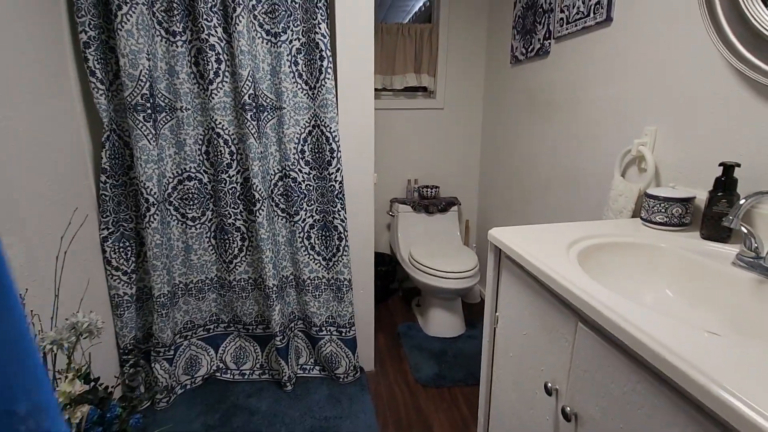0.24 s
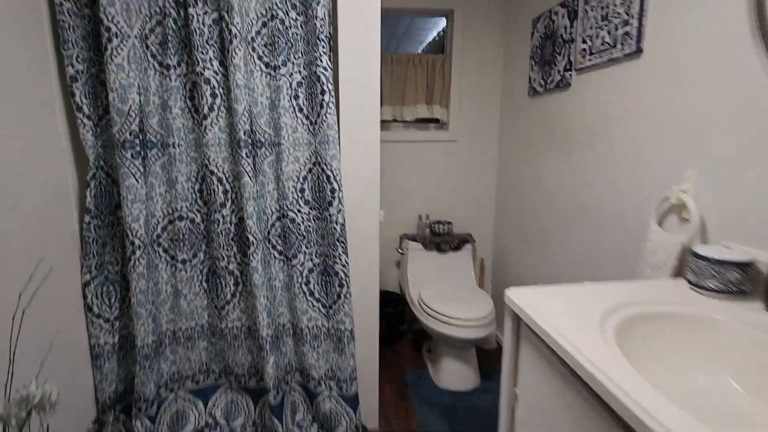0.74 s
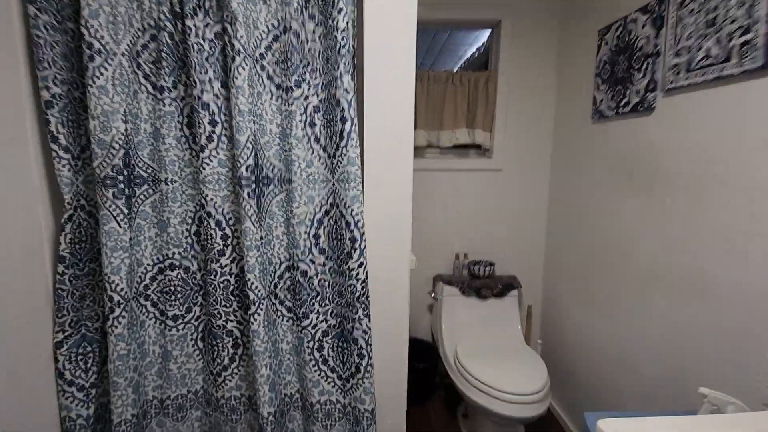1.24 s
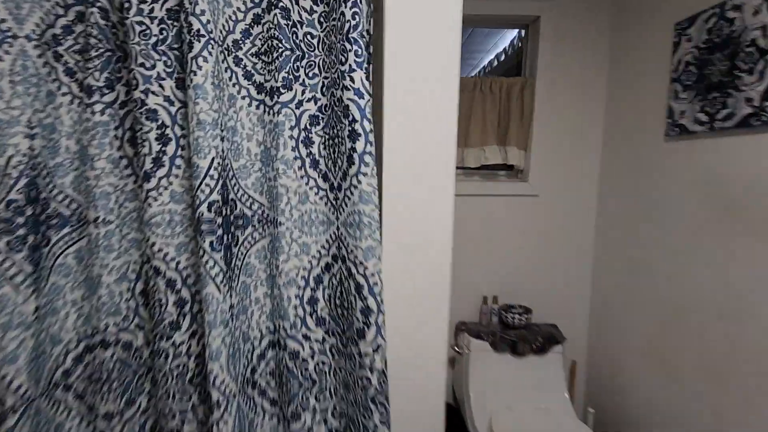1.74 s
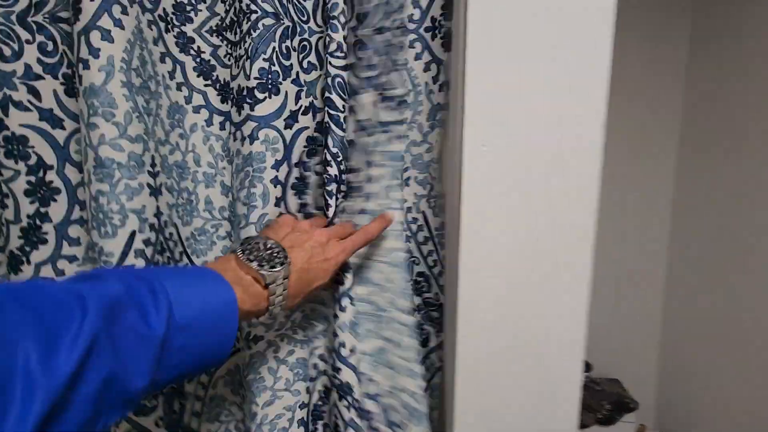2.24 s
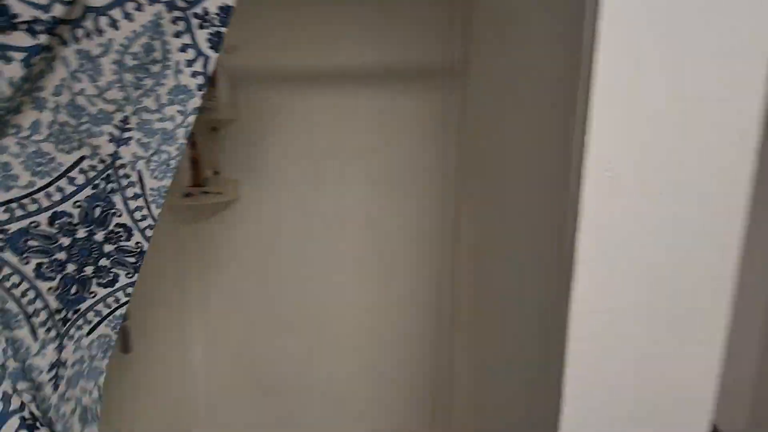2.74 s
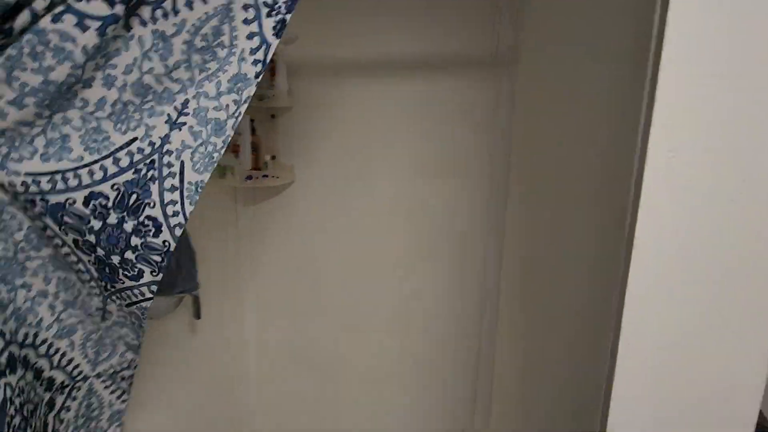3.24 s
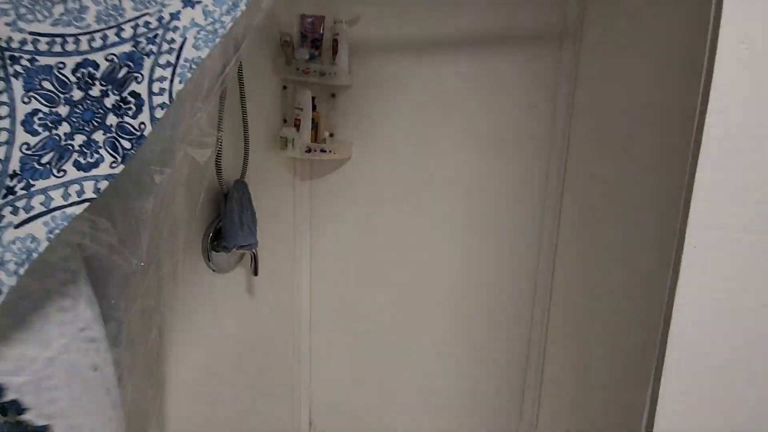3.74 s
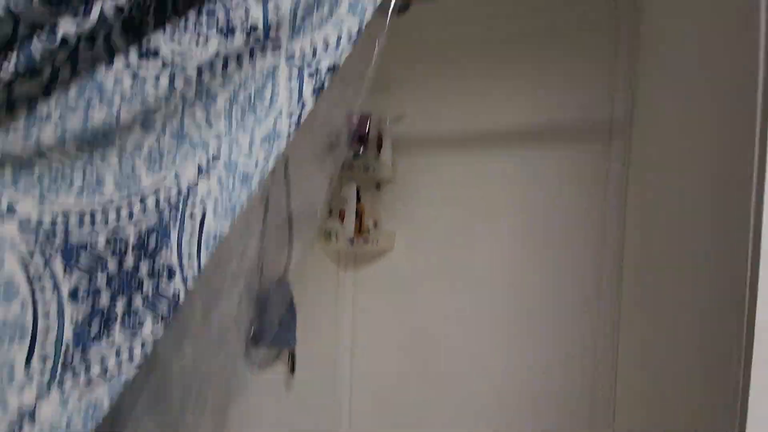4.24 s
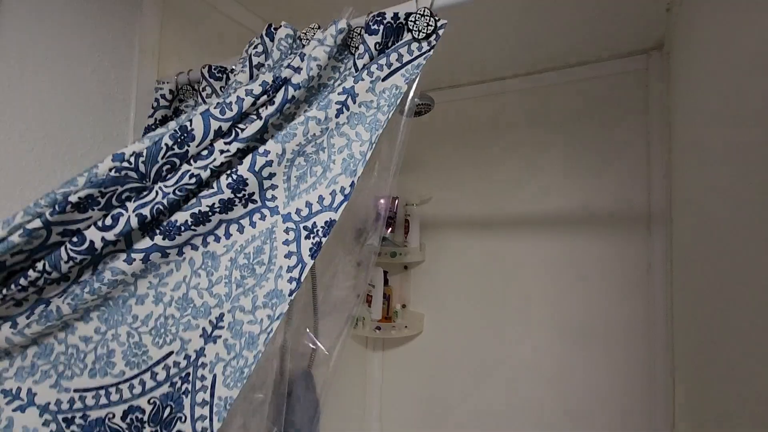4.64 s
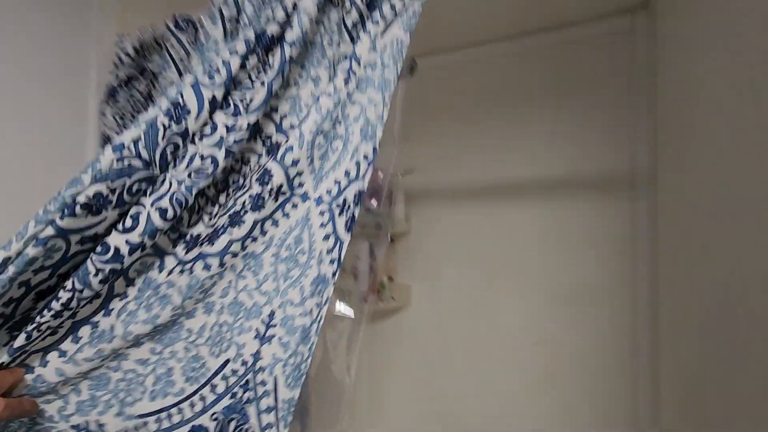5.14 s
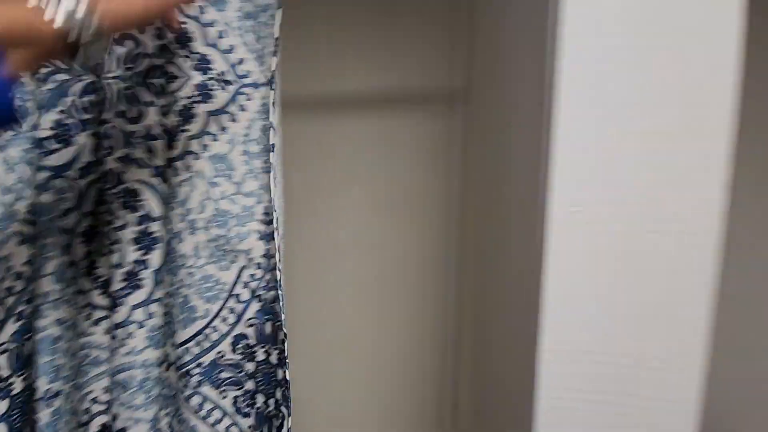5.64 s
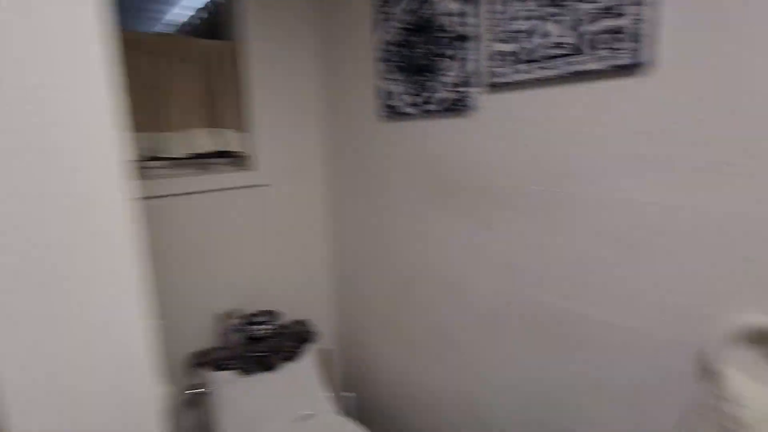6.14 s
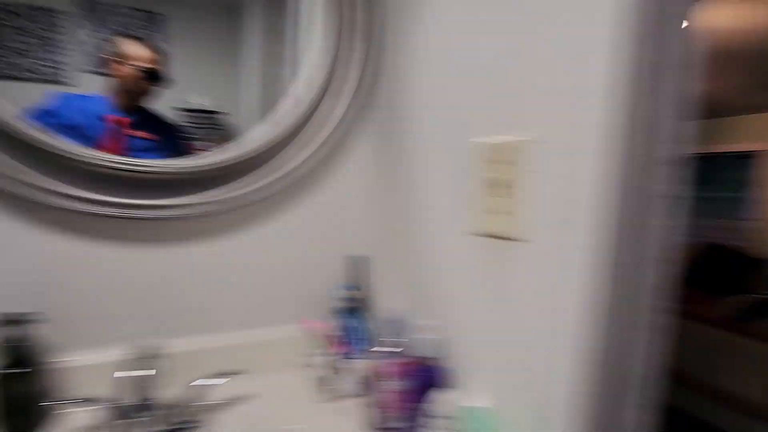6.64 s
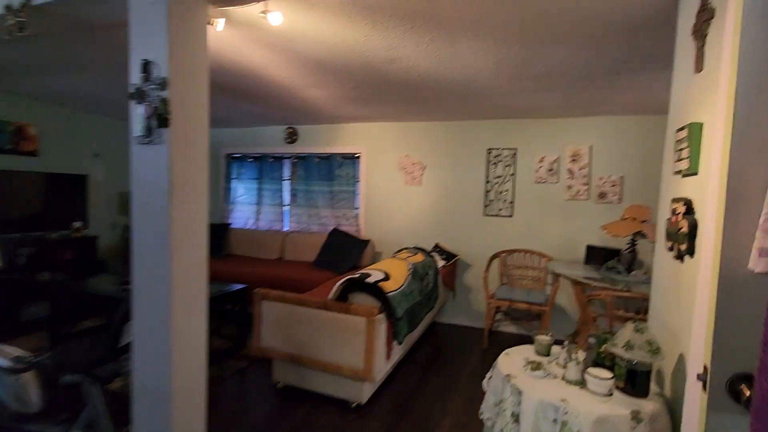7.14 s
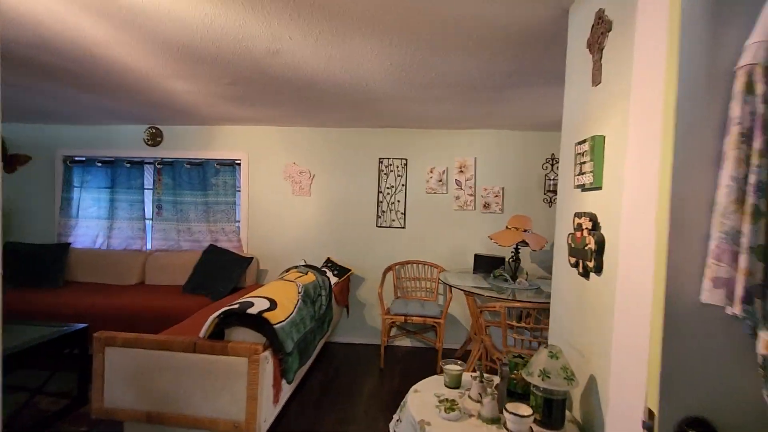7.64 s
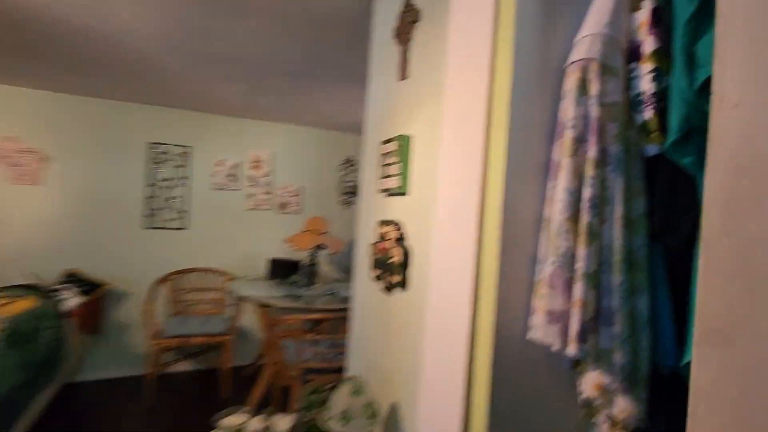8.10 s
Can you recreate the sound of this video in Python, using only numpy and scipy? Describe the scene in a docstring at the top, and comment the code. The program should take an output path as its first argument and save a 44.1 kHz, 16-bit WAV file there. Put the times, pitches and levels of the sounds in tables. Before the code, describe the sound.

Someone walks over a creaky-toned wooden floor, one step heavier than the others, then draws a fabric shower curtain: rings skid, briefly sing and crack against the rod, while plastic creases tick. A gentler push rustles and fades, and a last pull scrapes the rings back. A hollow knock, light watch jingle and muffled footfalls close it. Near microphone, short room reflections, low floor rumble and quiet air.

```python
"""In a small bathroom reached over a wooden floor, a walker draws a shower curtain aside and pulls it shut.
Curtain rings scrape by stick-slip friction and clack by impact; both excite the rod and shower stall.
Cloth and plastic liner rustle as filtered noise, sparse ticks and snapping creases.
Footsteps sum decaying floor modes with filtered heel impacts; clothes swish as dense noise grains.
A metal watch band jingles, dry knocks ring hollow, joists rumble and quiet air hisses."""
import sys
import numpy as np
from scipy import signal
from scipy.fft import rfft, irfft, next_fast_len
from scipy.io import wavfile
from scipy.ndimage import uniform_filter1d, map_coordinates

SR = 44100
rng = np.random.default_rng(int(sys.argv[2]) if len(sys.argv) > 2 else 0)


def transcribe(u):
    """Save the signal u as a 16-bit wav file named by the first command-line argument.

    u: samples, shape (n,) or (channels, n), limited to [-1, 1]; the rate is SR.
    q: integer samples, one column per channel.
    """
    v = np.clip(np.atleast_2d(u).T, -1, 1)
    q = np.round(v * 32767).astype(np.int16)
    wavfile.write(sys.argv[1], SR, q)


N = 369116

# All levels are relative to the fixed gains of the function that uses them.
# The walker shifts weight and the floor sways: start_s, length_s, rumble_db
WEIGHT_SHIFTS = [(0, 0.44, -42.5), (1.82, 0.13, -45.5), (2.2, 0.37, -47), (3.9, 0.087, -63),
                 (6.0, 0.51, -50.5), (6.45, 0.53, -50.5), (7.42, 0.089, -52.5), (7.88, 0.042, -48),
                 (8.32, 0.054, -39.5)]
SHIFT_ATTACK_S, SHIFT_RELEASE_S, RESTING_SWAY_DB = 0.2, 0.93, -65
# Spectrum of the rumbling joists: frequency_hz, gain_db
RUMBLE_SPECTRUM = [(15, -8), (27, -4.5), (36, -5.5), (44, -1.5), (52, -3.5), (90, -11.5), (130, -24),
                   (250, -37.5), (600, -89)]
# Spectrum of the quiet air: frequency_hz, gain_db
AIR_SPECTRUM = [(60, -4.5), (150, -14), (308, -24), (800, -22.5), (1500, -24), (2200, -22.5), (3000, -29),
                (4200, -30), (5400, -23.5), (7700, -25.5), (10000, -40), (13500, -28), (16000, -36.5)]
# Likeness of a diffuse sound at two microphones: frequency_hz, coherence (-1 to 1)
DIFFUSE_COHERENCE = [(60, 0.97), (150, 0.83), (280, 0.77), (520, 0.71), (1000, -0.05), (2000, 0.083),
                     (5000, -0.042)]

# Footfalls: start_s, thump_db, thump_hz, joist_db (relative to the thump), heel_db, hardness_hz
FOOTFALLS = [(0.008, -47, 187, -1, -35, 690), (0.783, -38, 151, -43, -28.5, 760),
             (1.071, -60, 164, -12, -43, 1280), (1.148, -57, 134, -3, -44.5, 450),
             (1.701, -24, 102, -0.5, -19.5, 764), (1.822, -51, 104, -3, -27.5, 1200),
             (2.142, -55.5, 189, -14, -40, 806), (6.502, -51, 259, -5, -34.5, 535),
             (7.32, -52, 163, 0, -42, 500), (7.490, -56.5, 182, -13, -39.5, 700),
             (7.794, -32.5, 160, -36, -25.5, 775), (8.202, -31.5, 125.2, -23, -29, 230),
             (8.214, -26, 82.5, -8, -27.5, 197)]
# Resonances of the floorboards: frequency_hz, width_hz, gain_db
BOARD_MODES = [(267.7, 6.9, 9.5), (299, 40, 4), (394, 13, 6), (422, 12, 0), (525, 16, 0), (605, 20, 1.5),
               (645, 18, -9), (1055, 12, 2)]

# Dry knocks of small hard things; the last is the heel's crack: start_s, level_db, brightness_db
KNOCK_EVENTS = [(0.278, -48.5, -2), (1.914, -39.5, 1), (6.7125, -32, 0.5), (7.265, -41.5, 9.5),
                (7.795, -42, 6)]
# Hollow ring of the knocks: frequency_hz, width_hz, gain_db
HOLLOW_MODES = [(1474, 56, 6.5), (1700, 260, 7), (2080, 250, 13.5), (5260, 320, -1.5), (7500, 380, 3)]
# Spectrum of the knocks: frequency_hz, gain_db
KNOCK_SPECTRUM = [(100, 8), (350, 10.5), (900, 2), (1400, 3), (2100, -6.5), (2800, -2.5), (4500, 2.5),
                  (7800, -4.5), (10000, -7), (13000, 0.5), (16000, -1.5)]

# Strides and reaches that rub the clothes: start_s, length_s, swish_db
SWISH_EVENTS = [(.88, 0.082, -64), (1.42, 0.059, -58), (1.80, 0.32, -56), (6.58, 0.16, -57),
                (6.8, 0.36, -64), (7.38, 0.16, -60.5), (7.78, 0.28, -54.5), (8.22, 0.077, -60.5)]
SWISH_ATTACK_S, SWISH_RELEASE_S = 0.22, 0.44
CLOTHES_SIDE_DB = -4.5  # left minus right

# Shakes of the watch band: start_s, level_db
JINGLE_EVENTS = [(1.798, -41.5), (1.868, -52), (6.825, -57), (7.420, -59), (7.468, -46), (7.488, -56)]
# Clustered resonances of the watch links: frequency_hz, width_hz, gain_db
LINK_MODES = [(6000, 56, -3), (7800, 50, -12), (10440, 63, -0.5), (11740, 100, -2), (12400, 200, -10),
              (13800, 170, 5), (14600, 200, -7), (15550, 200, -8)]

# Curtain motion as it is drawn aside, pushed further, and pulled shut: time_s, motion_db
DRAW, PUSH, SHUT = [
    [(2.22, -46), (2.266, -41.5), (2.424, -40), (2.536, -38), (2.68, -41), (2.928, -48.5), (3.206, -45.5),
     (3.558, -52.5), (3.78, -52)],
    [(3.82, -49.5), (4.032, -45.5), (4.188, -50), (4.414, -53.5), (4.602, -54), (4.752, -68), (4.94, -67.5)],
    [(4.98, -58.5), (5.232, -53.5), (5.376, -53), (5.804, -55.5), (6.004, -40), (6.148, -42.5),
     (6.266, -42.5), (6.436, -52.5), (6.6, -61.5)],
]
# Spectrum of rubbing fabric: frequency_hz, gain_db
RUSTLE_SPECTRUM = [(100, -16.5), (300, -3.5), (700, -4.5), (1500, -5), (3000, -3), (5500, -0.5), (6700, -4),
                   (7900, -0.5), (9200, -9.5), (10800, -8.5), (12200, -4.5), (14500, -3.5), (16000, -6.5)]
# Balance of the curtain: frequency_hz, left_minus_right_db
CURTAIN_SIDE = [(60, 0.5), (180, 1), (550, 2), (1650, -0.5), (4970, -0.5), (15000, -2.0)]

# Rings break loose and skid along the rod: start_s, length_s, scrape_db
RING_SKIDS = [(2.50, 0.094, -38), (2.585, 0.025, -28), (2.85, 0.013, -44.5), (3.86, 0.092, -37.5),
              (4.02, 0.013, -37.5), (4.285, 0.031, -40.5), (4.412, 0.0088, -44), (4.61, 0.16, -49.5),
              (5.215, 0.0074, -49), (5.34, .08, -48.5), (5.98, 0.068, -38.5), (6.042, 0.012, -30),
              (6.175, .02, -35.5), (6.24, 0.039, -39)]
SKID_ATTACK_S, SKID_RELEASE_S = 0.053, 0.2
# The fastest runs sing on the rod: start_s, length_s, level_db, pitch_hz
RING_RUNS = [(2.518, 0.044, -38.5, 2264), (4.29, .03, -49, 2210), (6.175, 0.064, -39.5, 2060)]
RUN_ATTACK_S, RUN_RELEASE_S = 0.062, 0.2
# Resonances of the rod, and at 280 Hz of the shower stall: frequency_hz, width_hz, gain_db
ROD_AND_STALL_MODES = [(280, 11, 5.5), (402, 17, 11), (1083, 9.2, 6), (1280, 15, 8), (1460, 12, 10.5),
                       (1730, 10, 12), (1964, 54, 7.5), (2290, 120, 4), (3960, 36, 10.5), (4470, 11, 0),
                       (7460, 120, 9.5)]
# Spectrum of the scraping rings: frequency_hz, gain_db
SCRAPE_SPECTRUM = [(60, -33), (150, -10), (260, 0.5), (400, -6), (650, -3.5), (1000, -3.5), (2100, 0),
                   (2800, 0.5), (4200, -3.5), (7000, -6), (10000, -14.5), (16000, -37)]
RING_DRAG_DB, RING_SONG_DB = -5, -9.5  # scrape and song of dragged rings, relative to the motion
SONG_HZ = 2195
RUN_WIDTH_HZ, SONG_WIDTH_HZ = 210, 300  # a fast run sings more purely than a drag
SLIP_UNEVEN_DB = 2.5

# Creases snapping in the liner at set times: start_s, peak_db, body_db
CREASE_SNAPS = [(2.187, -33.5, 3), (2.2485, -25, -10), (2.2574, -23, 4.5), (2.9338, -26.5, -13),
                (2.9854, -22, -23), (3.5032, -25.5, -11), (3.816, -24.5, -12), (4.1784, -26, 0.5),
                (4.238, -23, -15), (4.542, -29, -2.5), (4.999, -36, -5), (5.013, -30.5, -7),
                (5.3988, -33, -16), (5.4488, -29.5, -2), (5.7376, -29.5, -5), (6.6414, -36, 7),
                (6.6613, -34, -22)]
# Further creases snap at random, louder when the curtain moves harder
CREASES_PER_S, CREASE_DB, CREASE_SCATTER_DB, CREASE_BODY_DB = 16, -34, 4, -6
CREASE_GROWS = 0.77  # dB of snap per dB of motion

# Rings striking the rod and each other: start_s, peak_db, body_db
RING_CLACKS = [(2.578, -16, -1.5), (2.599, -12.5, -17), (2.6124, -15.5, -7), (2.6584, -19.5, -22),
               (2.6984, -24.5, -8.5), (2.8521, -28.5, 1), (3.8449, -19, -14.5), (4.0073, -22, -10.5),
               (6.0399, -10.5, -27), (6.0468, -15.5, -13), (6.323, -22, -35), (6.4254, -20, -22)]
# Spectrum of clacks and snaps: frequency_hz, gain_db
CLICK_SPECTRUM = [(150, 1), (400, -12), (1000, 1.5), (2200, -6), (2900, -0.5), (4000, 0.5), (7900, -3),
                  (9300, -8), (10800, -10), (12300, -0.5), (16000, -1.5)]

TOP_HZ = 15850  # upper limit of the band


def amp(db):
    """Decibel law: amplitude gain is ten to the power of dB / 20."""
    return 10 ** (np.asarray(db) / 20)


def unit(x):
    """Root-mean-square normalisation to 1."""
    return x / np.sqrt(np.mean(x ** 2) + 1e-20)


def balance(left_minus_right_db):
    """Level panning: half the difference raises the left, half lowers the right."""
    return amp(left_minus_right_db * np.array([[.5], [-.5]]))


def along(points, hz):
    """Interpolation of (Hz, value) points over logarithmic frequency."""
    f, v = np.transpose(points)
    return np.interp(np.log(hz + 1), np.log(f), v)


def level(rows):
    """Envelope interpolated in decibels from (s, dB) rows, fading out beyond both ends."""
    s, db = np.transpose(rows)
    times = np.r_[s[0] - .1, s, s[-1] + .1]
    return amp(np.interp(np.arange(N) / SR, times, np.r_[-100, db, -100]))


def swells(rows, attack_s, release_s):
    """Energy sum of (s, length, dB) events: linear rise up to s, hold, then a 60 dB fall in release_s."""
    t = np.arange(N) / SR
    each = []
    for s, length, db in rows:
        rise = np.clip(1 + (t - s) / attack_s, 0, 1)
        fall_db = 60 * np.maximum(t - s - length, 0) / release_s
        each.append(amp(db - fall_db) * rise)
    return np.linalg.norm(each, axis=0)


def wobble(rate):
    """Band-limited randomness: a smooth curve through rate random knots a second."""
    knots = rng.standard_normal(int(N * rate / SR) + 4)
    return map_coordinates(knots, [np.arange(N) * rate / SR])


def grains(rate, spread_db):
    """Shot noise: about rate random impulses a second, of uneven size, with rms 1."""
    struck = rng.random(N) < rate / SR
    size = rng.standard_normal(N)
    unevenness = amp(spread_db * np.clip(rng.standard_normal(N), -2, 2))
    return unit(struck * size * unevenness)


def filtered(x, response):
    """Linear filtering: the spectrum of x times a function of frequency."""
    n = x.shape[-1]
    m = next_fast_len(n + 8192)
    return irfft(rfft(x, m) * response(np.fft.rfftfreq(m, 1 / SR)), m)[..., :n]


def coloured(x, gain_db, size=2048):
    """Minimum-phase filtering to a dB response: causality keeps attacks sharp."""
    cepstrum = irfft(np.log(amp(gain_db(np.fft.rfftfreq(size, 1 / SR))) + 1e-6))
    # Folding the cepstrum onto positive time makes the filter causal
    cepstrum[1:size // 2] *= 2
    cepstrum[size // 2 + 1:] = 0
    impulse = irfft(np.exp(rfft(cepstrum)))
    return signal.fftconvolve(x, impulse[None], axes=1)[:, :x.shape[1]]


def resonant(x, modes):
    """Modal resonance: a body answers as a sum of (Hz, width, dB) band-pass modes."""
    def response(f):
        return sum(amp(db) * 1j * f * w / (c * c - f * f + 1j * f * w) for c, w, db in modes)
    return filtered(x, response)


def add(track, s, x):
    """Superposition: mix x into the track at time s."""
    start = max(0, round(s * SR))
    part = track[..., start:start + x.shape[-1]]
    part += x[..., :part.shape[-1]]


def diffuse(n):
    """Diffuse-field coherence: the mid-to-side ratio sets the likeness of two noise channels."""
    def turn(hz):
        return np.arccos(np.clip(along(DIFFUSE_COHERENCE, hz), -1, 1)) / 2
    noise = rng.standard_normal((2, n))
    mid, side = filtered(noise, lambda hz: np.array([np.cos(turn(hz)), np.sin(turn(hz))]))
    return np.array([mid + side, mid - side])


def in_room(x, wet_db, lead_ms, low_t60=0.23, high_t60=0.11, split_hz=6000):
    """Reverberation: direct sound leads by lead_ms at left; a diffuse tail dies faster in the treble."""
    t = np.arange(SR // 3) / SR

    def tail(t60):
        # Energy builds over the first 1.3 ms: the first walls are a little way off
        fade = amp(-60 * t / t60) ** 2 * np.clip(t / 0.0013, 0, 1) ** 2
        energy = signal.fftconvolve(x ** 2, fade / fade.sum())[:len(x)]
        return np.sqrt(np.abs(energy)) * diffuse(len(x))

    def low(hz):
        return 1 / (1 + (hz / split_hz) ** 2)

    wet = filtered(tail(low_t60), lambda hz: np.sqrt(low(hz)))
    wet = wet + filtered(tail(high_t60), lambda hz: np.sqrt(1 - low(hz)))
    ears = np.array([[1], [-1]])
    direct = filtered(x, lambda f: np.exp(1j * np.pi * f * lead_ms / 1000 * ears))
    return (direct + amp(wet_db) * wet) / np.hypot(1, amp(wet_db))


def contact(t60, wet_db, lead_ms):
    """Impact excitation: a unit-energy, decaying noise burst placed in the room."""
    t = np.arange(SR // 4) / SR
    burst = rng.choice([-1, 1], len(t)) * amp(-60 * t / t60)
    return in_room(burst / np.linalg.norm(burst), wet_db, lead_ms)


def background():
    """Broadband noise shaping: joists rumble under the walker, over the quiet air of the house."""
    rumble = unit(filtered(diffuse(N), lambda hz: amp(along(RUMBLE_SPECTRUM, hz))))
    air = unit(filtered(diffuse(N), lambda hz: amp(along(AIR_SPECTRUM, hz))))
    sway = np.hypot(amp(RESTING_SWAY_DB), swells(WEIGHT_SHIFTS, SHIFT_ATTACK_S, SHIFT_RELEASE_S))
    return sway * rumble + amp(-61.0) * air


def footsteps():
    """Modal decay: each floor spot thumps at its own pitch, weight rocks joists, soft heels dull boards."""
    out, t = np.zeros((2, N)), np.arange(SR) / SR

    def mode(hz, db, t60):
        return amp(db - 60 * t / t60) * np.sin(2 * np.pi * hz * t)

    for s, db, thump_hz, weight_db, heel_db, hard_hz in FOOTFALLS:
        thump = mode(thump_hz, db=6.0, t60=0.17) + mode(thump_hz / 2, db=-9.5, t60=0.56)
        joists = mode(hz=28.2, db=weight_db, t60=0.8) + mode(hz=38.5, db=weight_db - 21, t60=0.68)
        add(out, s, -amp(db) * (thump + joists))

        def soften(hz):
            return -10 * np.log10(1 + (hz / hard_hz) ** 5) + along([(60, -3.5), (300, -3.5)], hz)

        heel = contact(t60=0.0091, wet_db=2, lead_ms=0)
        boards = coloured(heel + amp(1) * resonant(heel, BOARD_MODES), soften)
        add(out, s, amp(heel_db + 21.0) * boards / np.linalg.norm(boards))
    return out * balance(0.8)


def knocks():
    """Impact and resonance: dry blows excite a hollow middle register."""
    out = np.zeros((2, N))
    for s, db, bright_db in KNOCK_EVENTS:
        def colour(hz):
            return along(KNOCK_SPECTRUM, hz) + along([(3000, 0), (8000, bright_db)], hz)
        blow = contact(t60=0.04, wet_db=1.5, lead_ms=-0.057)
        knock = coloured(blow + amp(4) * resonant(blow, HOLLOW_MODES), colour)
        add(out, s, amp(db + 31.0) * knock / np.linalg.norm(knock))
    return out


def clothes():
    """Friction noise: sleeves and trouser legs swish as dense grains with the rustle's spectrum reshaped."""
    def colour(hz):
        tilt = [(900, 5.5), (1800, 7.5), (3500, -2.0), (8000, 1.5), (14000, 2.0)]
        return along(RUSTLE_SPECTRUM, hz) + along(tilt, hz)
    strength = amp(6.0) * swells(SWISH_EVENTS, SWISH_ATTACK_S, SWISH_RELEASE_S)
    swish = in_room(strength * grains(rate=6100, spread_db=4.5), wet_db=12.5, lead_ms=0)
    return coloured(swish, colour)


def watch():
    """High-frequency modal ringing: steel links shiver against each other and ring briefly."""
    out = np.zeros((2, N))
    for s, db in JINGLE_EVENTS:
        chatter = contact(t60=0.16, wet_db=-1, lead_ms=0)
        hiss = coloured(chatter, lambda hz: along([(6000, -36), (13000, -3)], hz))
        ring = resonant(chatter, LINK_MODES) + amp(-29) * hiss
        add(out, s, amp(db + 32.0) * ring / np.linalg.norm(ring))
    return out


def curtain_path():
    """Kinematics: the (s, dB) rows of all three pulls in sequence."""
    return np.vstack([DRAW, PUSH, SHUT])


def motion():
    """Common driving force: strength of the curtain's movement through all three pulls."""
    return level(curtain_path())


def cloth():
    """Friction and buckling: folds rub with a smooth hiss while the liner crinkles in sparse ticks."""
    rub = rng.standard_normal(N) * amp(2.4 * wobble(24))
    crinkle = amp(-1.0) * grains(rate=240, spread_db=8.0)
    moved = amp(7.5) * motion() * (rub + crinkle)
    return coloured(in_room(moved, wet_db=10.0, lead_ms=0.15), lambda hz: along(RUSTLE_SPECTRUM, hz))


def song(hz, width_hz):
    """Amplitude modulation: random quadrature envelopes make a narrow, fuzzy band around one pitch."""
    phase = 2 * np.pi * hz * np.arange(N) / SR
    sides = [wobble(width_hz) * np.cos(phase) + wobble(width_hz) * np.sin(phase) for side in range(2)]
    return np.array(sides)


def rings():
    """Stick-slip friction: dense tiny slips ring the rod and stall, and fast runs sing in one narrow band."""
    slide = np.hypot(amp(RING_DRAG_DB) * motion(), swells(RING_SKIDS, SKID_ATTACK_S, SKID_RELEASE_S))
    slips = slide * grains(rate=4000, spread_db=1.5) * amp(SLIP_UNEVEN_DB * wobble(35))
    slips = in_room(slips, wet_db=4.5, lead_ms=0.17)
    scrape = slips + amp(-8.5) * resonant(slips, ROD_AND_STALL_MODES)
    scrape = coloured(scrape, lambda hz: along(SCRAPE_SPECTRUM, hz))
    drag_song = amp(RING_SONG_DB) * motion() * song(SONG_HZ, SONG_WIDTH_HZ)
    runs = np.zeros((2, N))
    for s, length, db, hz in RING_RUNS:
        runs += swells([(s, length, db)], RUN_ATTACK_S, RUN_RELEASE_S) * song(hz, RUN_WIDTH_HZ)
    return amp(6.5) * scrape + drag_song + runs


def patchy(x, depth_db, size=512):
    """Random time-frequency gain: the rustle and scrape are uneven, patchy in grain."""
    z = signal.stft(x, nperseg=size)[2]
    field = uniform_filter1d(rng.standard_normal(z.shape[1:]), size=3, axis=0)
    field = uniform_filter1d(field, size=8, axis=1)
    return signal.istft(z * amp(depth_db * unit(field)), nperseg=size)[1][:, :N]


def random_creases():
    """Poisson process: random (s, peak dB, body dB) snaps between the first pull and the last."""
    s, db = np.transpose(curtain_path())
    chance = rng.random((120, 2))
    times = s[0] + np.cumsum(-np.log(1 - chance[:, 0])) / CREASES_PER_S  # exponential gaps
    growth = CREASE_GROWS * (np.interp(times, s, db) - db.mean())
    peaks = CREASE_DB + growth + CREASE_SCATTER_DB * (2 * chance[:, 1] - 1)
    return [(t, peak, CREASE_BODY_DB) for t, peak in zip(times, peaks) if t < s[-1]]


def snaps():
    """Snap-through buckling: a crease in the plastic flips over with one bright tick."""
    out = np.zeros((2, N))
    for s, db, body_db in [*CREASE_SNAPS, *random_creases()]:
        def colour(hz):
            return along(CLICK_SPECTRUM, hz) + along([(2000, body_db), (6000, 0)], hz)
        tick = amp(db + 20) * contact(t60=0.0042, wet_db=4, lead_ms=.15)
        add(out, s, coloured(tick, colour))
    return out


def clacks():
    """Impact excitation: a ring hits its neighbour with a short crack that also rings the rod and stall."""
    out = np.zeros((2, N))
    for s, db, body_db in RING_CLACKS:
        def colour(hz):
            return along(CLICK_SPECTRUM, hz) + along([(1800, body_db + 8.5), (4000, 0)], hz)
        crack = amp(db + 20.5) * contact(t60=0.0092, wet_db=4.0, lead_ms=0.252)
        add(out, s, coloured(crack + amp(-9.5) * resonant(crack, ROD_AND_STALL_MODES), colour))
    return out


def scene():
    """Superposition: the curtain has its own side balance; the walker's layers, knocks and air join it."""
    curtain = patchy(rings() + cloth(), depth_db=2) + clacks() + snaps()
    curtain = filtered(curtain, lambda hz: balance(along(CURTAIN_SIDE, hz)))
    walker = footsteps() + clothes() * balance(CLOTHES_SIDE_DB) + watch()
    return curtain + walker + knocks() + background()


def record(dry):
    """Band limitation: a very steep low-pass removes what lies above TOP_HZ."""
    return filtered(dry, lambda hz: 1 / np.sqrt(1 + (hz / TOP_HZ) ** 300))


dry = scene()
out = record(dry)
transcribe(out)
```